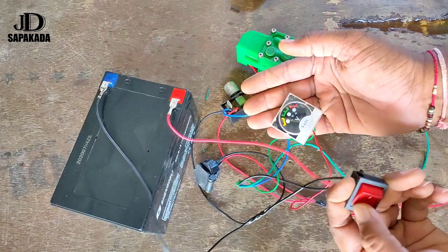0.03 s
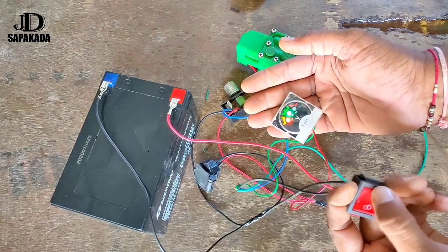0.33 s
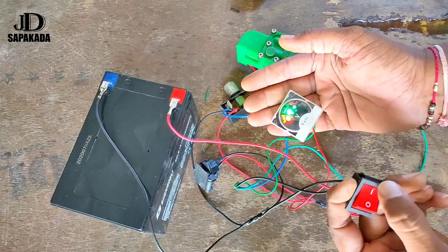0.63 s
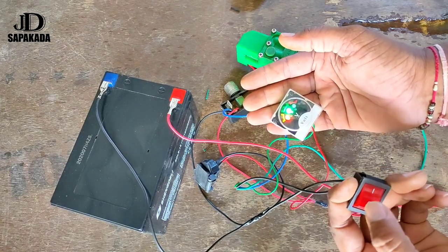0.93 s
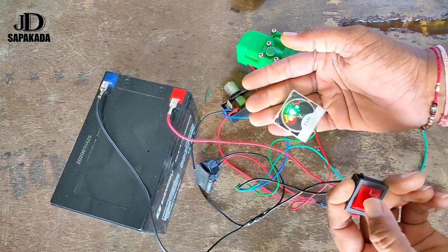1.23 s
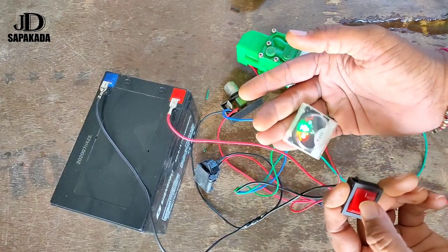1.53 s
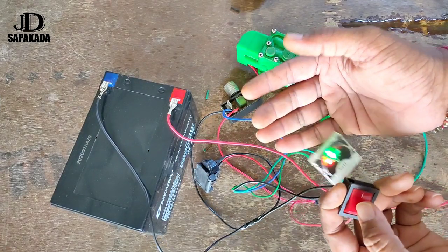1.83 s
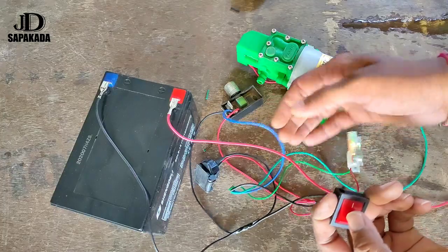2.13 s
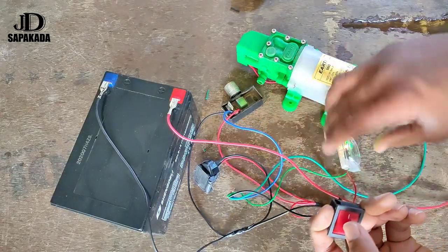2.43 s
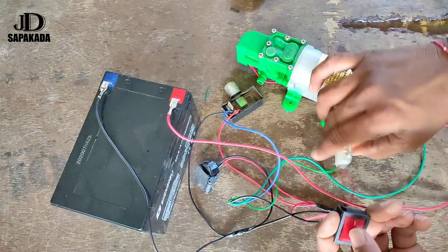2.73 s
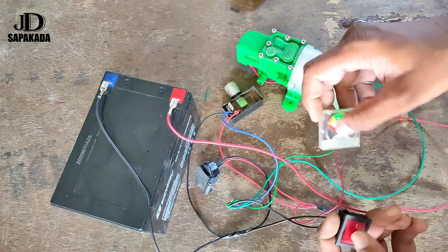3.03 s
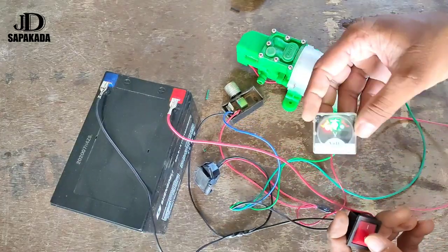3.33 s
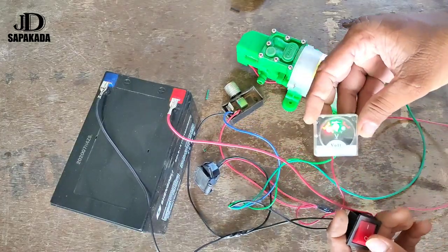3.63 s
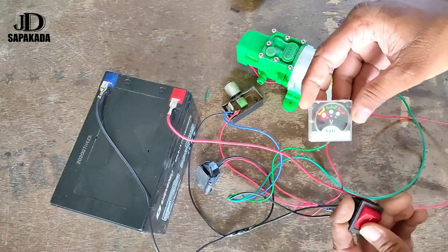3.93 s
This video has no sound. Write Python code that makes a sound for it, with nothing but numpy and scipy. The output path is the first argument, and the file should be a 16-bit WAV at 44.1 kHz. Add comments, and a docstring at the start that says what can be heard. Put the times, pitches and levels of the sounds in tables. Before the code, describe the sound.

A small electric pump buzzes close by in a bare room. An earlier run fades right at the start into faint hum. At 0.4 seconds a switch snaps and the steady buzz begins, with plastic rattle and a thin whine. Around 2 seconds a small plastic object drops on stone with a few light knocks, then a soft thump. Near 3.9 seconds the switch snaps again and the pump dies quickly.

```python
"""Over low room noise and a faint hum, the last breath of an earlier pump run dies away. A rocker switch
snaps, and the small battery-driven diaphragm pump buzzes on a stone floor: two strokes a turn make the
buzz and puff air, valves and bearing rattle in the plastic housing, and the motor whines thinly.
Halfway, a small plastic meter drops on the floor and is handled; a few soft thumps lie underneath.
Just before the end the switch snaps again and the pump dies away."""
import sys
import numpy as np
from scipy import signal
from scipy.fft import rfft, irfft, next_fast_len
from scipy.io import wavfile
from scipy.ndimage import map_coordinates

SR = 44100
rng = np.random.default_rng(int(sys.argv[2]) if len(sys.argv) > 2 else 0)


def int16_out(signal):
    """Quantize to a 16-bit WAV file."""
    q = np.round(np.clip(np.atleast_2d(signal).T, -1, 1) * 32767)
    wavfile.write(sys.argv[1], SR, q.astype(np.int16))


N = 176400
ON_S, OFF_S = .396, 3.943  # the motor gets and loses its current


def amp(db):
    """Decibels to gain."""
    return 10 ** (np.asarray(db) / 20)


def unit(x):
    """x scaled to rms 1."""
    return x / np.sqrt(np.mean(x ** 2) + 1e-20)


def along(points, hz):
    """Read (Hz, value) points along a log frequency axis."""
    freqs, values = np.transpose(points)
    return np.interp(np.log(hz + 1), np.log(freqs + 1), values)


def clock():
    """Seconds at each sample."""
    return np.arange(N) / SR


def curves(rows):
    """One automation curve for each column after the time."""
    times, *columns = np.transpose(rows)
    return [np.interp(clock(), times, column) for column in columns]


def wobble(rate):
    """A smooth random drift, rate knots a second."""
    t = clock()
    coarse_s = t[::32]
    knots = rng.standard_normal(int(N * rate / SR) + 4)
    return np.interp(t, coarse_s, map_coordinates(knots, [coarse_s * rate]))


def coloured(x, spectrum):
    """x through a minimum-phase EQ drawn as (Hz, dB) points."""
    size = 2 * next_fast_len(N)
    gain = amp(along(spectrum, np.fft.rfftfreq(size, 1 / SR)))
    cepstrum = irfft(np.log(gain), size)
    cepstrum[1:size // 2] *= 2
    cepstrum[size // 2 + 1:] = 0
    return irfft(rfft(x, size) * np.exp(rfft(cepstrum)), size)[:N]


def in_room(x, wet_db):
    """x with the short tail of a bare room."""
    # Room decay. Each row: frequency in Hz, seconds to fall 60 dB.
    decay = [(200, 0.43), (3000, 0.23), (12000, 0.36)]
    hz, t, grains = signal.stft(rng.standard_normal(SR // 2), SR, nperseg=256)
    tail = signal.istft(grains * amp(-60 * t / along(decay, hz)[:, None]), SR, nperseg=256)[1]
    tail = np.pad(tail / np.linalg.norm(tail), (SR // 300, 0))  # pre-delay
    return x + amp(wet_db) * signal.fftconvolve(x, tail)[:N]


def background(bed_db=-41, hum_hz=468, hum_db=-51):
    """A bed of low room noise with a faint wavering hum."""
    # Colour of the bed. Each row: frequency in Hz, relative level in dB.
    bed_eq = [(15, -39), (25, -17), (69, -0.5), (196, -14), (237, -3.5), (271, -13), (415, -6.5), (462, 0),
              (529, -26), (588, -14), (8100, -39.5), (11800, -48), (15000, -45)]
    hum = amp(hum_db + 2.2 * wobble(20)) * np.sin(2 * np.pi * hum_hz * clock() + .83 * wobble(25))
    return amp(bed_db) * unit(coloured(rng.standard_normal(N), bed_eq)) + hum


def running(rise_s=.014, fall_db_per_s=184, earlier_db=-13.5):
    """The pump's envelope: an earlier run fades, then it rises with the current and dies without it."""
    t = clock()
    earlier = amp(earlier_db - fall_db_per_s * t)
    rise = 1 - np.exp(-np.maximum(t - ON_S, 0) / rise_s)
    fall = amp(-fall_db_per_s * np.maximum(t - OFF_S, 0))
    return earlier + rise * fall


def buzz(turns, speed_hz, lower_db, upper_db):
    """Two unequal strokes a turn; the upper partials of each come late, from the pump head."""
    # Buzz partials. Each row: multiple of the shaft speed, relative level in dB.
    partials = [(1, -15.5), (2, -21.5), (3, -26.5), (4, -6.5), (5, -15.5), (6, -3), (7, -5), (8, 1),
                (9, -3), (10, -5.5), (11, -11.5), (12, -3), (13, -7.5), (14, 0.5), (15, -4), (16, -9),
                (17, -17), (18, -35), (19, -31.5)]
    second_strength, second_at_turns = .81, .4607  # the weaker stroke, which shapes the phases
    head_hz, head_width_hz, head_lag_s = 800, 56, .0025  # the head answers late above head_hz
    trim_db, flutter_db = .23, .46
    out = np.zeros(N)
    for k, db in partials:
        hz = k * speed_hz
        stroke_phase = np.angle(1 + second_strength * np.exp(-2j * np.pi * k * second_at_turns))
        lag_cycles = head_lag_s * head_width_hz * np.logaddexp(0, (hz - head_hz) / head_width_hz)
        band_db = upper_db if hz > head_hz else lower_db
        level_db = db + band_db + flutter_db * (wobble(5.99) + wobble(21.9))
        out += amp(level_db) * np.cos(2 * np.pi * (k * turns - lag_cycles) + stroke_phase)
    partials_rms = np.sqrt(sum(amp(db) ** 2 for _, db in partials) / 2)
    return amp(trim_db) * out / partials_rms


def stroke_noise(turns, depth):
    """White noise that swells twice a turn."""
    return rng.standard_normal(N) * (1 + depth * np.cos(4 * np.pi * turns))


def chuff(turns):
    """Air puffs through the pump head with every stroke."""
    # Colour of the puffs. Each row: frequency in Hz, relative level in dB.
    air_eq = [(25, -31.5), (60, -14), (110, -17.5), (200, -11.5), (300, -6.5), (380, -2), (470, -1),
              (530, -3), (650, 0.5), (750, -7.5), (850, 0), (1000, 5), (1150, -8), (1600, -9.5),
              (4000, -57)]
    return amp(-14) * unit(coloured(stroke_noise(turns, depth=.37), air_eq))


def housing(force):
    """The plastic shell colours what shakes it, at equal level; its small parts ring in the treble."""
    # Narrow rings. Each row: centre in Hz, width in Hz, send level in dB.
    resonances = [(4730, 300, -9.5), (6500, 300, -12.5), (8450, 220, -7)]
    # Colour of the shell. Each row: frequency in Hz, relative level in dB.
    shell_eq = [(710, -29.5), (1200, -10), (1240, -19), (1290, -15), (1710, -6), (2030, -4.5), (2190, -8),
                (2510, -11.5), (2650, -6), (2890, -5.5), (3110, -0.5), (3320, 2), (3460, -1.5), (3940, -18),
                (4240, -23.5), (5490, -29), (6730, -25), (12000, -40.5), (14700, -46), (15500, -70)]
    rings = sum(amp(db) * signal.lfilter(*signal.iirpeak(hz, hz / width_hz, fs=SR), force)
                for hz, width_hz, db in resonances)
    return force.std() * unit(coloured(force + rings, shell_eq))


def rattle(turns, soften_hz=4960, surge_db=.9):
    """Valves and bearing tick unevenly in step with the shaft, over brush hiss; all ring the housing."""
    # Knocking parts. Each row: ticks a turn, scatter in turns, size spread in dB, relative level in dB.
    contacts = [(2, .07, 5, -4.5), (4.42, .06, 4, -2), (7.7, .2, 4, -5)]
    ticks = np.zeros(N)
    for per_turn, scatter, spread_db, db in contacts:
        slip, size = rng.standard_normal((4000, 2)).T
        at = np.searchsorted(turns, np.arange(len(slip)) / per_turn + scatter * slip)
        ticks += np.bincount(at, amp(db + spread_db * np.minimum(size, 2)), N + 1)[:N]
    ticks = signal.lfilter(*signal.butter(1, soften_hz, fs=SR), ticks)
    ticks *= amp(surge_db * wobble(20))  # unsteady contact force
    hiss = stroke_noise(turns, depth=.25)
    clatter = unit(in_room(ticks - ticks.mean(), wet_db=-1))
    return housing(amp(-4.5) * clatter + amp(-7) * hiss)


def whine(turns):
    """The motor sings thin, unsteady lines high above the buzz."""
    # Whine lines. Each row: multiple of the shaft speed, relative level in dB.
    lines = [(38.8, -19), (44.2, -21), (48.7, -24)]
    return sum(amp(db + 1.2 * wobble(12)) * np.sin(2 * np.pi * k * turns + wobble(12))
               for k, db in lines)


def pump(jitter_turns=.002, stumble_turns=.06):
    """One shaft drives every layer; as the pump catches or coasts, clean buzz gives way to puffs."""
    # Shaft speed. Each row: time in seconds, turns a second.
    shaft_speed = [(0.53, 69.21), (0.68, 69.06), (0.85, 69.09), (1.2, 68.93), (1.45, 68.99), (1.6, 68.95),
                   (1.78, 69.05), (1.92, 68.91), (2.08, 68.97), (2.4, 68.65), (2.56, 68.87), (2.75, 68.65),
                   (2.95, 68.53), (3.15, 68.61), (3.25, 68.66), (3.5, 68.42), (3.7, 68.21), (3.88, 68.21)]
    # Fader rides. Each row: time in seconds, then dB for lower buzz and puffs, for upper buzz,
    # and for rattle and whine.
    faders = [(0.47, -17, -16.5, -20.5), (0.95, -14.5, -14, -19), (1.4, -14, -14, -17.5),
              (1.8, -13.8, -13.5, -17), (1.99, -15, -15.8, -19), (2.025, -19, -17.5, -21),
              (2.25, -16, -17, -18.5), (2.7, -14, -16, -17), (3.12, -14.5, -15, -16.5),
              (3.18, -16, -16.5, -18), (3.72, -14, -16, -18), (3.92, -15, -17.1, -17)]
    speed_hz, = curves(shaft_speed)
    lower_db, upper_db, rattle_db = curves(faders)
    envelope = running()
    unsettled = 1 - envelope
    duck_db, puff_boost_db = -5.5, 13.5  # when fully unsettled
    turns = np.cumsum(speed_hz) / SR + jitter_turns * wobble(25)
    turns += stumble_turns * unsettled * wobble(70)
    tone = amp(duck_db * unsettled) * buzz(turns, speed_hz.mean(), lower_db, upper_db)
    puffs = amp(lower_db + puff_boost_db * np.sqrt(np.abs(unsettled))) * chuff(turns)
    mechanics = amp(rattle_db) * (rattle(turns) + whine(turns))
    return envelope * (tone + puffs + mechanics)


def struck(hits, modes, body_eq, treble_hz, crack_db, crack_t60_s=.013):
    """Each hit rings the modes, with a short crack on top; a soft hit has less treble and crack."""
    out, t = np.zeros(N + SR), np.arange(SR // 4) / SR
    for start_s, db, treble_db in hits:
        ring = np.zeros(len(t))
        for hz, mode_db, t60_s in modes:
            onset_db = mode_db + treble_db * (hz > treble_hz) + rng.normal(0, 1)
            ring += amp(onset_db - 60 * t / t60_s) * np.sin(2 * np.pi * hz * t)
        crack = amp(crack_db + treble_db - 60 * t / crack_t60_s) * rng.standard_normal(len(t))
        out[round(start_s * SR):][:len(t)] += amp(db) * (ring + crack)
    return coloured(out[:N], body_eq)


def rocker_switch():
    """The rocker snaps on and later off, bright and dry: so small a part radiates no bass."""
    # Snaps. Each row: start in seconds, level in dB, treble offset in dB.
    snaps = [(.3848, -18, -4), (.3867, -5, -6.5), (3.9457, -4.5, -4)]
    # Switch modes. Each row: pitch in Hz, relative level in dB, seconds to fall 60 dB.
    modes = [(2090, 0, 0.0093), (2400, -4, 0.0074), (3360, -7, 0.012), (3700, -12.5, .007),
             (4570, -3.5, 0.0062), (5580, -9.5, 0.0064), (7060, -7.5, .008)]
    # Thin body. Each row: frequency in Hz, gain in dB.
    body_eq = [(100, -45), (1100, -31), (1700, -2.5), (8500, -1), (16000, -1)]
    return struck(snaps, modes, body_eq, treble_hz=4000, crack_db=-9)


def thumps(pitch_hz=58, swell_s=.02):
    """Soft low thumps, each a sine that swells and fades."""
    # Each row: start in seconds, envelope peak in dB.
    hits = [(.44, -31), (2.285, -28), (3.65, -39), (3.73, -36)]
    out = np.zeros(N)
    for start_s, db in hits:
        age = np.maximum(clock() - start_s, 0)
        swell = age / swell_s * np.exp(1 - age / swell_s)
        out += amp(db) * swell * np.sin(2 * np.pi * pitch_hz * age)
    return out


def meter_drop():
    """The small plastic meter lands on the stone and is handled; each knock rings its case."""
    # Knocks. Each row: start in seconds, level in dB, treble offset in dB.
    knocks = [(1.994, -14.5, 1.5), (2.002, -6.5, -23), (2.104, -14, -9), (2.134, -14, -4)]
    # Case modes. Each row: pitch in Hz, relative level in dB, seconds to fall 60 dB.
    modes = [(270, -9, .03), (353, -4, 0.026), (398, 0, 0.027), (600, -4, 0.035), (970, 9, 0.024),
             (1410, 3, .016)]
    # Colour of the case. Each row: frequency in Hz, gain in dB.
    body_eq = [(40, -32), (170, -25), (280, -3), (1600, 0), (7000, 2), (16000, -12)]
    return struck(knocks, modes, body_eq, treble_hz=700, crack_db=-17.5)


def scene():
    """Pump, switch and meter in one room, over the bed and the thumps, in mono."""
    clicks = in_room(rocker_switch() + meter_drop(), wet_db=-5)
    return (pump() + clicks + background() + thumps())[None]


def record(dry):
    """Round off the highest peaks, then cut everything above the band limit."""
    ceiling, top_hz = .8, 15700
    rounded = dry / (1 + np.abs(dry / ceiling) ** 8) ** (1 / 8)
    size = next_fast_len(N + SR // 2)
    passband = np.fft.rfftfreq(size, 1 / SR) < top_hz
    return irfft(rfft(rounded, size) * passband, size)[..., :N]


dry = scene()
out = record(dry)
int16_out(out)
```